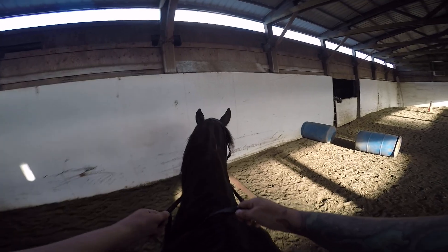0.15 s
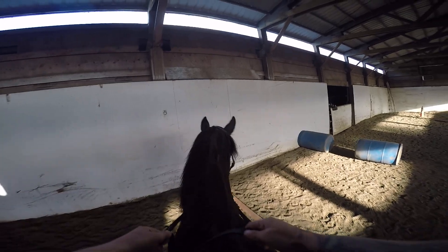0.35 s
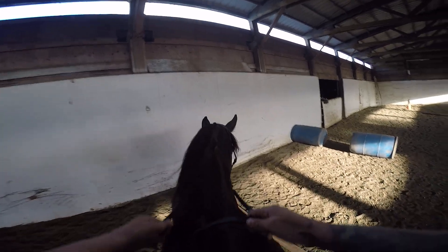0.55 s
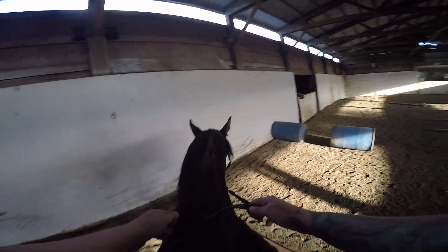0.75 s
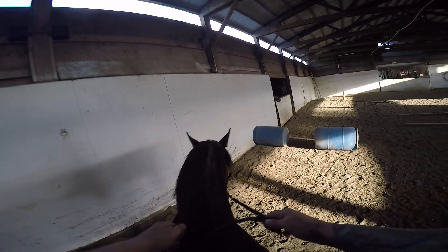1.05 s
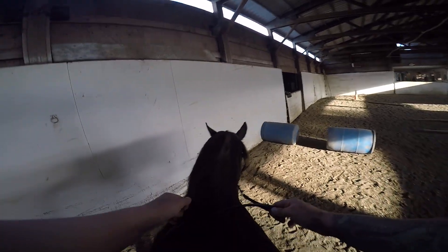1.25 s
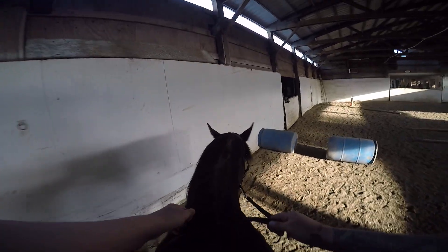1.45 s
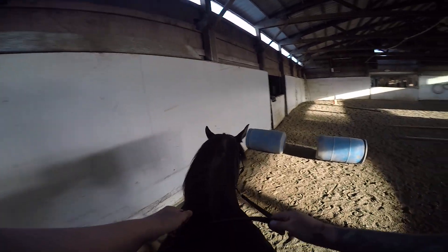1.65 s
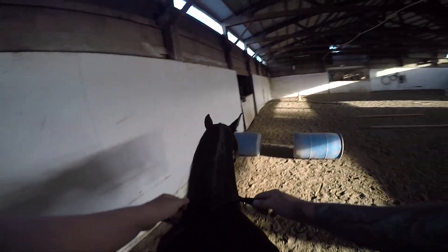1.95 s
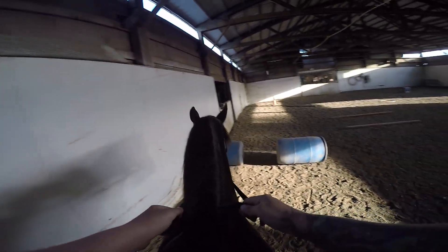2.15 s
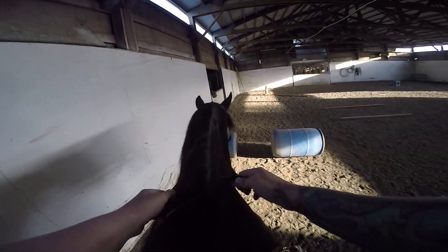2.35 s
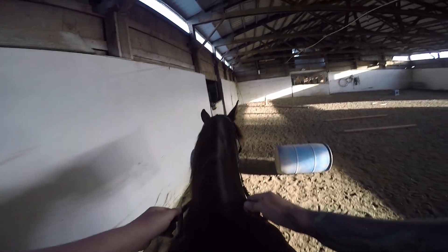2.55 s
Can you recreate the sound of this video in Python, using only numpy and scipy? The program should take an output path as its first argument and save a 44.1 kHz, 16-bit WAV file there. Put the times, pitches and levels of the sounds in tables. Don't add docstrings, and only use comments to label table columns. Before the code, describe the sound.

A horse's hoof thuds on deep sand, felt as deep, short jolts in a rider-worn camera case at about 0.2, 0.66, 1.1, 1.6, 2.05 and 2.5 seconds, the fourth weaker. Between them come lighter footfalls, sandy scuffs and tack ticks, busiest near 0.25, 0.5, 2.2 and 2.6. Low, lumpy air rumble and quiet steady hiss run throughout, with barely audible high electronic tones.

```python
import sys
import numpy as np
from scipy import signal
from scipy.io import wavfile
from scipy.ndimage import uniform_filter1d

SR = 44100
rng = np.random.default_rng(int(sys.argv[2]) if len(sys.argv) > 2 else 0)


def invert_db(level):
    return 10 ** (np.asarray(level, dtype=float) / 20)


def pcm_store(signal):
    levels = np.round(np.clip(np.atleast_2d(signal), -1, 1) * 32767)
    wavfile.write(sys.argv[1], SR, levels.astype(np.int16).T)


N = 119070

# peak in seconds, level in dB, pitch in Hz, ring t60 in seconds,
# extra level of the first hoof in dB.
JOLTS = [
    (0.208, -21, 31, 0.13, -7.5),
    (.664, -20.5, 30.1, 0.16, -10.5),
    (1.125, -21, 33.2, 0.15, -12.5),
    (1.583, -27, 34.9, 0.29, -1),
    (2.0539, -22.5, 29.4, 0.16, -11.5),
    (2.524, -22.5, 33.5, 0.093, -5.5),
]


def evened(x):
    return x / np.sqrt(np.mean(x ** 2) + 1e-20)


def read(points, hz):
    f, value = np.transpose(points)
    return np.interp(np.log(hz + 1), np.log(f + 1), value)


def resonate(x, hz, width):
    return signal.lfilter(*signal.iirpeak(hz, hz / width, SR), x)


def bell(t, width_s):
    return np.exp(-.5 * (t / width_s) ** 2)


def noise(colour_db, size, patchy_db, wide_hz, long_s):
    hop = size // 4
    frames, hz = N // hop + 5, np.fft.rfftfreq(size, 1 / SR)
    a, b, patches = rng.standard_normal((frames, len(hz), 3)).T
    patches = uniform_filter1d(patches, max(1, round(wide_hz / hz[1])), 0)
    patches = evened(uniform_filter1d(patches, max(1, round(long_s * SR / hop)), 1))
    level_db = colour_db(hz[:, None], np.arange(frames) * hop / SR) + patchy_db * patches
    z = (a + 1j * b) * invert_db(level_db)
    return signal.istft(z, nperseg=size, noverlap=size - hop)[1][:N]


def jolts():
    swell_s = 0.013
    lift_lead_s, lift_db, lift_wide_s = 0.048, -13, 0.0093
    first_lead_s, first_hz, first_wide_s = 0.02745, 65.4, 0.0039
    out = np.zeros(N)
    for s, db, hz, t60, extra_db in JOLTS:
        t = np.arange(N) / SR - s
        decay = invert_db(-60 * np.maximum(t, 0) / t60)
        thump = np.where(t < 0, bell(t, swell_s), decay) * np.cos(2 * np.pi * hz * t)
        lift = invert_db(lift_db) * bell(t + lift_lead_s, lift_wide_s)
        u = t + first_lead_s
        first_hoof = invert_db(extra_db) * bell(u, first_wide_s) * np.sin(2 * np.pi * first_hz * u)
        out += invert_db(db) * (thump + lift + first_hoof)
    return out


def swings(rows):
    t = np.arange(N) / SR
    return sum(-invert_db(db) * bell(t - s, wide) * np.cos(2 * np.pi * hz * (t - s)) for s, db, hz, wide in rows)


def footfalls():
    # peak in seconds, level in dB, pitch in Hz, width in seconds.
    bumps = [
        (0.497, -32.5, 60, 0.0029),
        (0.759, -35.5, 23.9, 0.037),
        (1.199, -42, 40, 0.012),
        (1.459, -33, 60, 0.0028),
        (1.787, -36, 49.5, 0.0014),
        (1.945, -31.5, 22.8, 0.014),
        (2.273, -30.5, 25.7, 0.0093),
        (2.648, -40.5, 88, 0.02),
    ]
    return swings(bumps)


def scuffs():
    # start in seconds, hold in seconds, level in dB, bright part in dB, dull part in dB.
    showers = [(0.244, 0.037, -63, -14, -3.5), (0.274, 0.056, -70.5, 3.5, -3), (0.418, 0.057, -63, -7, -15),
               (0.501, 0.032, -67.5, 4, -3), (0.525, 0.086, -70.5, 7, 9), (0.57, 0.11, -67, -5.5, -4),
               (0.715, 0.05, -72, 1.5, -6), (0.791, 0.092, -69, -3, 1.5), (1.033, 0.023, -59, -2, 1),
               (1.08, 0.043, -66, -4, 1.5), (1.198, 0.056, -85, -11, 17.5), (1.352, 0.12, -77, 4, 10.5),
               (1.394, 0.025, -63, -6.5, -1), (1.501, 0.043, -77.5, 7.5, -15),
               (1.603, 0.011, -55.5, -7.5, -33), (1.677, 0.075, -71, -11, -8), (1.776, 0.065, -69, -7, 7),
               (1.998, 0.028, -61.5, -18, -3.5), (2.128, 0.048, -62, -6, -1),
               (2.184, 0.055, -57.5, -2.5, -6), (2.246, 0.058, -61.5, -1, -25),
               (2.312, 0.062, -65, -4, -15), (2.577, 0.038, -61, -7, -13), (2.592, 0.03, -63, 1.5, 3),
               (2.66, 0.065, -71, 5.5, 0)]
    # pitch in Hz, width in Hz, level in dB.
    dull = [(266, 244, -3.5), (567, 110, -5)]
    body = [(996, 283, 16.5), (1070, 420, -19), (1450, 330, 7.5), (1780, 1300, 2.5)]
    bright = [(2586, 510, 5), (3087, 455, 4.5), (3770, 1100, -7.5), (4930, 290, -23), (7170, 1300, -9)]
    rise_s, tail_t60_s = .003, .16
    grains_per_s, grain_spread_db = 2500, 5
    rub_share = 0.46

    t = np.arange(N) / SR
    hit, size, rubs = rng.random(N), rng.exponential(1, N), rng.standard_normal((3, N))
    grain_size = invert_db(grain_spread_db * np.minimum(size, 4))
    grains = (hit < grains_per_s / SR) * grain_size * np.sign(rubs[0])
    power = np.zeros((3, N))
    for s, hold, db, bright_db, dull_db in showers:
        tail = invert_db(-60 * np.maximum(t - s - hold, 0) / tail_t60_s)
        shape = np.clip((t - s) / rise_s, 0, 1) * tail
        power += (shape * invert_db([[db + dull_db], [db], [db + bright_db]])) ** 2

    def ring(x, modes):
        return sum(invert_db(db) * resonate(resonate(x, hz, 1.5 * w), hz, 1.5 * w) for hz, w, db in modes)

    out = np.zeros(N)
    for level, rub, modes in zip(np.sqrt(power), rubs, (dull, body, bright)):
        drive = np.sqrt(1 - rub_share) * evened(grains) + np.sqrt(rub_share) * rub
        out += ring(level * drive, modes) / np.std(ring(drive, modes))
    return out


def rings(rows):
    length, rise_s = 4000, .0025
    out, t = np.zeros(N + length), np.arange(length) / SR
    rise = np.sin(np.pi / 2 * np.minimum(t / rise_s, 1)) ** 2
    for s, db, hz, t60 in rows:
        rough = resonate(resonate(rng.standard_normal(length), hz, .3 * hz), hz, .3 * hz)
        ring = np.sin(2 * np.pi * hz * t) + .4 * evened(rough)
        out[round(s * SR):][:length] += invert_db(db - 60 * t / t60) * rise * ring
    return out[:N]


def tack_ticks():
    # start in seconds, level in dB, pitch in Hz, t60 in seconds.
    ticks = [(0.2048, -42, 266, 0.059), (.2035, -46, 2630, 0.012), (0.257, -49, 2150, 0.014),
             (.269, -44, 930, 0.012), (0.282, -46, 2720, 0.011), (.505, -41, 2900, 0.0073),
             (.505, -46, 5040, .01), (0.5283, -45.5, 1532, 0.046), (.5295, -44.5, 3500, 0.018),
             (0.5452, -44.5, 1348, 0.035), (0.546, -51.5, 3142, 0.036), (0.813, -53, 2660, 0.047),
             (0.834, -57, 2770, 0.048), (1.377, -57.5, 2680, 0.064), (1.415, -53, 1560, 0.023),
             (1.418, -52.5, 2400, 0.022), (1.602, -46, 934, 0.039), (1.612, -55.5, 1890, 0.046),
             (2.155, -52, 5600, 0.019), (2.208, -42.5, 1070, 0.048), (2.214, -47, 2376, 0.052),
             (2.225, -52.5, 4830, 0.013), (2.593, -53.5, 1485, 0.15), (2.622, -52.5, 3030, 0.1)]
    return rings(ticks)


def sand_grit():
    # start in seconds, level in dB, pitch in Hz, t60 in seconds.
    grit = [(.257, -54, 2700, 0.014), (.269, -49, 1540, .018), (.289, -59, 1050, .03),
            (0.293, -56, 1380, 0.032), (.295, -56, 3170, .04), (.43, -55, 919, .04),
            (0.454, -54, 997, 0.066), (.558, -51, 1480, 0.052), (.584, -51, 1350, 0.043),
            (.588, -58.5, 2600, .06), (.598, -62, 3020, 0.028), (0.619, -56.5, 1452, 0.063),
            (1.043, -57, 3000, .04), (1.045, -55, 2600, .04), (1.046, -53, 880, 0.04),
            (1.072, -58, 1094, .09), (1.095, -58, 2480, 0.043), (1.345, -60, 2530, .05),
            (1.509, -58, 1450, .05), (1.53, -55, 1300, .05), (1.614, -47.5, 990, 0.03),
            (1.805, -57, 2634, 0.045), (2.005, -46.5, 860, .04), (2.012, -48.5, 1077, 0.037),
            (2.028, -61.5, 3140, .05), (2.138, -53.5, 895, .04), (2.154, -57, 3804, .03),
            (2.155, -49, 1160, 0.045), (2.189, -61, 3050, .04), (2.205, -47.5, 1590, .04),
            (2.206, -46.5, 3140, 0.053), (2.221, -51, 2811, 0.035), (2.222, -52, 1080, .04),
            (2.24, -52.5, 3032, .04), (2.249, -53, 3170, .04), (2.266, -52, 1020, .05),
            (2.283, -61, 3060, 0.061), (2.307, -57, 2480, .04), (2.575, -60, 960, .04),
            (2.59, -53, 1102, .04), (2.602, -60, 2870, .04), (2.605, -57, 3290, .04),
            (2.607, -52.5, 860, .05), (2.621, -51.5, 1070, .04), (2.632, -57, 3330, 0.072)]
    return rings(grit)


def hoof_knocks():
    # start in seconds, level in dB, pitch in Hz, t60 in seconds.
    knocks = [
        (.2025, -50, 570, .02),
        (.2025, -48, 380, .022),
        (.66, -48, 500, .03),
        (.661, -53, 660, .02),
        (.661, -49, 330, .03),
        (1.0355, -47, 1100, .04),
        (1.9945, -47, 882, .04),
        (2.206, -53, 1950, .05),
    ]
    return rings(knocks)


def eddies():
    # peak in seconds, level in dB, pitch in Hz, width in seconds.
    buffets = [(0.585, -52, 179, 0.026), (0.693, -59.5, 202, 0.025), (.749, -55, 211, 0.017),
               (.83, -48, 126, .025), (.87, -51.5, 154, 0.019), (0.91, -53.5, 194.3, 0.029),
               (1.05, -52, 208, 0.011), (1.058, -56, 285, 0.013), (1.199, -46, 91, 0.02),
               (1.32, -53.5, 141, 0.024), (1.353, -51.5, 237, 0.015), (1.368, -50, 143, 0.022),
               (1.41, -42.5, 125, 0.01), (1.451, -44, 155, 0.018), (1.604, -45, 130, 0.022),
               (1.646, -43.5, 125, 0.013), (1.738, -48.5, 166, 0.013), (1.803, -51, 155, 0.016),
               (1.825, -44, 76.5, 0.036), (2.16, -53.5, 170, 0.017), (2.295, -43, 96, 0.016),
               (2.346, -52, 183, .02), (2.611, -62, 302, 0.013), (2.634, -57, 214, 0.013)]
    return swings(buffets)


def air():
    # time in seconds, strength in dB.
    strength = [(0, -55.5), (.15, -52.5), (.35, -54.5), (.5, -51.5), (.75, -48.5), (.88, -53), (.98, -52.5),
                (1.2, -52.5), (1.3, -51), (1.45, -49.5), (1.62, -50.5), (1.75, -53), (1.95, -51.5),
                (2.1, -53.5), (2.3, -50), (2.45, -53), (2.57, -53), (2.66, -51.5)]
    # frequency in Hz, density in dB per Hz.
    rumble_colour = [(8, -47), (14, 3.5), (28, 1), (50, -10), (105, -12.5), (185, -22), (250, -27.5),
                     (420, -37)]
    s, db = np.transpose(strength)

    def colour(hz, t):
        follow = 1 / (1 + (60 / (hz + 1)) ** 4)
        roll_off = 12 * np.log2(np.maximum(hz / 450, 1))
        return read(rumble_colour, hz) - roll_off + follow * (np.interp(t, s, db) - db.mean())

    rumble = evened(noise(colour, size=4096, patchy_db=2, wide_hz=60, long_s=.04))
    return invert_db(db.mean() + 9) * rumble


def stilled_air():
    hush, hush_s = .75, .045
    t = np.arange(N) / SR
    rumble = air() * np.minimum(.4 + t / .03, 1)
    deep = signal.sosfiltfilt(signal.butter(2, 60, fs=SR, output="sos"), rumble)
    return rumble - hush * sum(bell(t - row[0], hush_s) for row in JOLTS) * deep


def hiss():
    # frequency in Hz, density in dB per Hz.
    hiss_colour = [(240, -54), (400, -11.5), (979, -10), (2030, -11), (3100, -10.5), (4600, -15),
                   (5040, -18), (15000, -23.5)]
    # pitch in Hz, width in Hz, height in dB.
    humps = [(1070, 920, 3), (2630, 1000, 1.5), (5050, 160, 10), (6150, 1100, 4), (9300, 140, 2.5)]

    def colour(hz, t):
        lift = sum(db / (1 + (2 * (hz - f) / w) ** 2) for f, w, db in humps)
        low_fall = 12 * np.log2(np.maximum(400 / (hz + 1), 1))
        return read(hiss_colour, hz) + lift - low_fall + 0 * t

    return invert_db(-63.67) * evened(noise(colour, size=512, patchy_db=1.27, wide_hz=800, long_s=0.041))


def electronic_tones():
    # pitch in Hz, rms level in dB.
    tones = [(12228, -93), (14146, -97)]
    t = np.arange(N) / SR
    return sum(np.sqrt(2) * invert_db(db) * np.sin(2 * np.pi * hz * t) for hz, db in tones)


def scene():
    horse = jolts() + footfalls() + scuffs() + tack_ticks() + sand_grit() + hoof_knocks()
    background = eddies() + stilled_air() + hiss() + electronic_tones()
    return (horse + background)[None]


def top_cut(x):
    return signal.sosfilt(signal.butter(12, 15190, fs=SR, output="sos"), x)


def record(dry):
    dropouts = [
        .2,
        .64,
        .66,
        .745,
        1.115,
        1.135,
        1.225,
        1.565,
        2.035,
        2.51,
    ]
    dropout_s, top_hz = .012, 13000
    t = np.arange(N) / SR
    x = signal.lfilter(*signal.butter(1, 1, "high", fs=SR), dry)
    high_pass = signal.firwin(255, top_hz, pass_zero=False, fs=SR)
    top = signal.oaconvolve(x, high_pass[None], "same")
    gaps = np.minimum(sum(np.exp(-((t - s) / dropout_s) ** 4) for s in dropouts), 1)
    return top_cut(x - gaps * top)


dry = scene()
out = record(dry)
pcm_store(out)
```